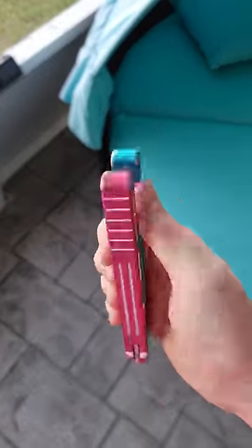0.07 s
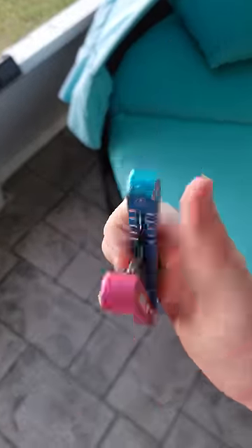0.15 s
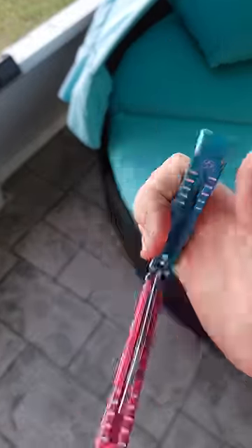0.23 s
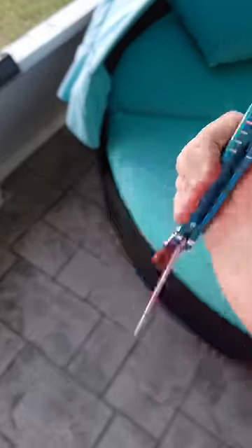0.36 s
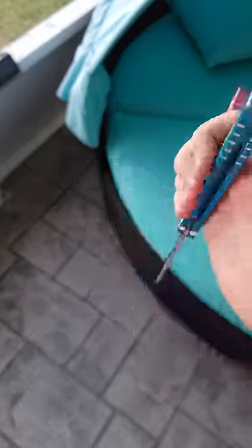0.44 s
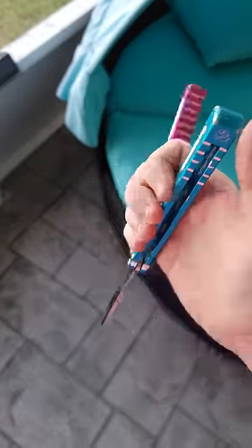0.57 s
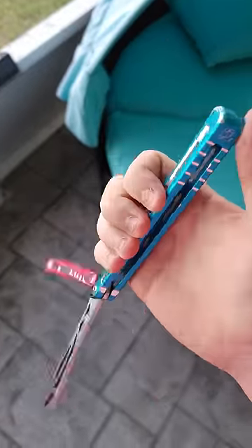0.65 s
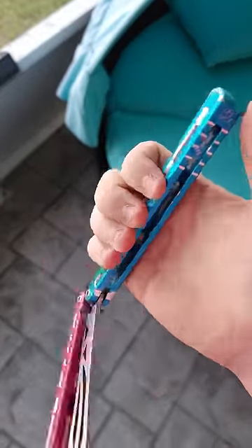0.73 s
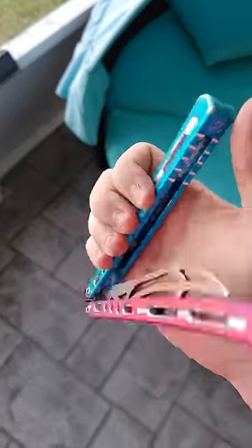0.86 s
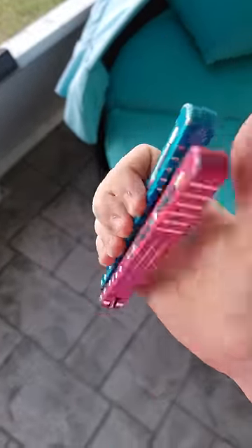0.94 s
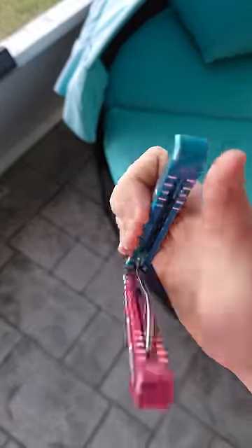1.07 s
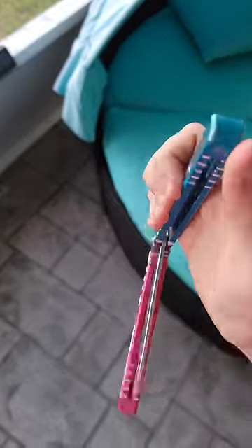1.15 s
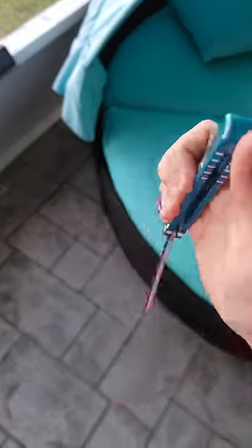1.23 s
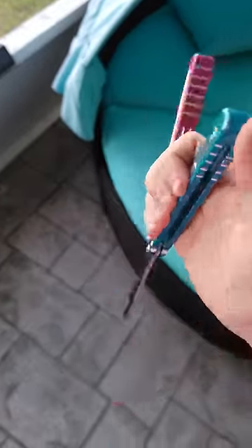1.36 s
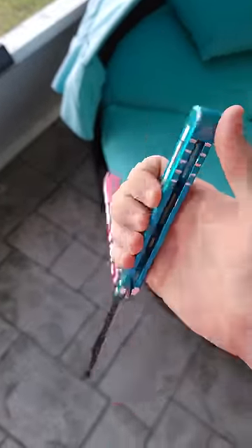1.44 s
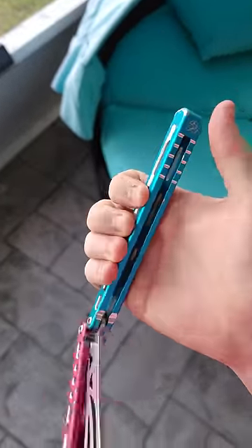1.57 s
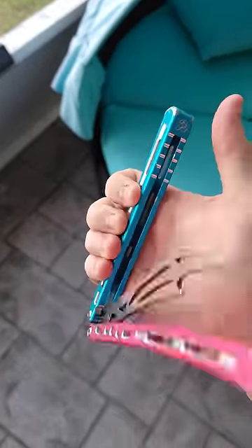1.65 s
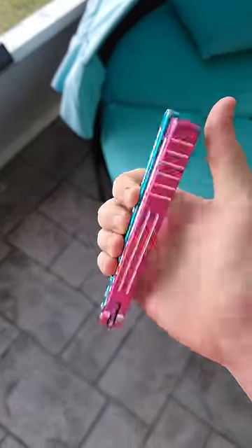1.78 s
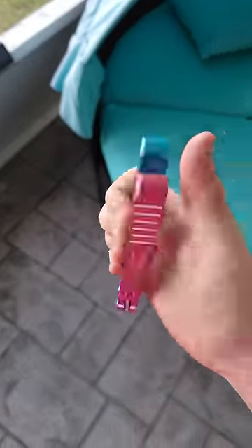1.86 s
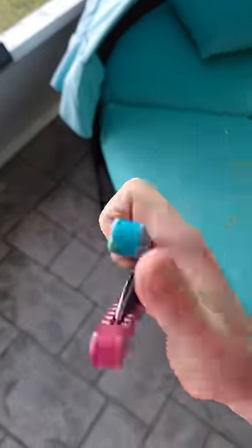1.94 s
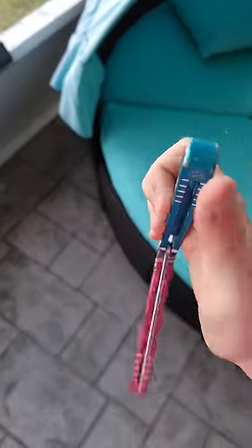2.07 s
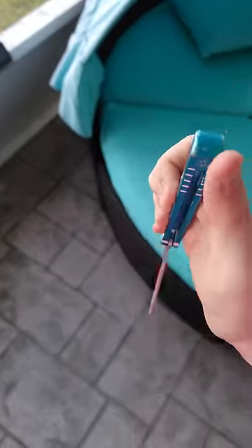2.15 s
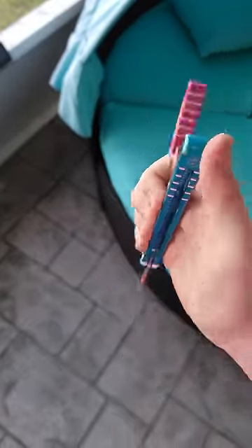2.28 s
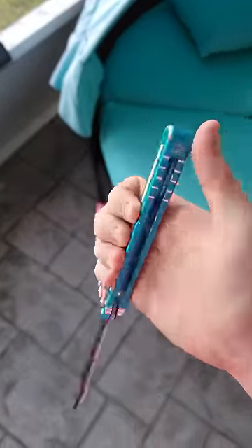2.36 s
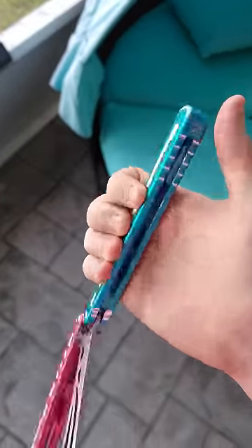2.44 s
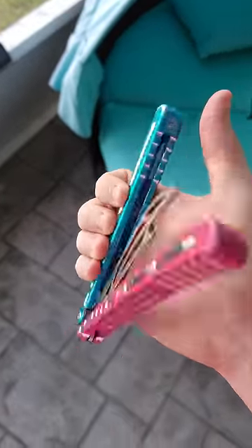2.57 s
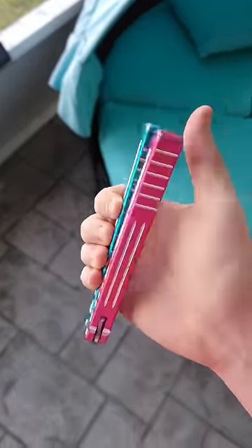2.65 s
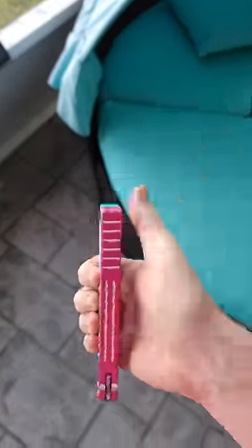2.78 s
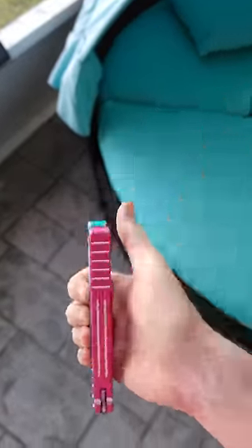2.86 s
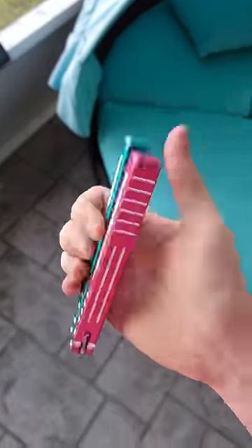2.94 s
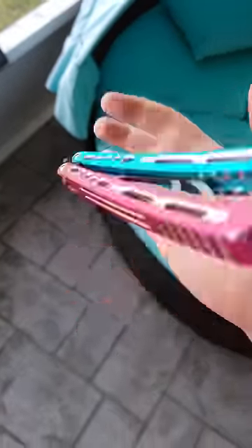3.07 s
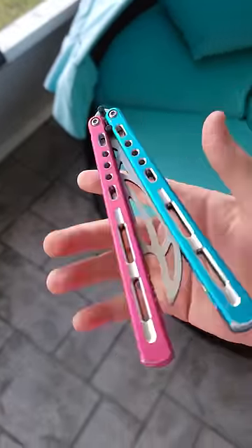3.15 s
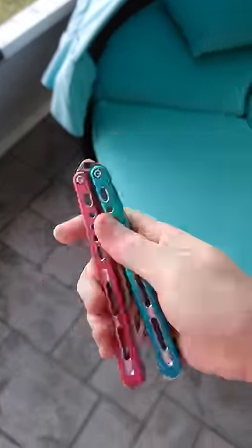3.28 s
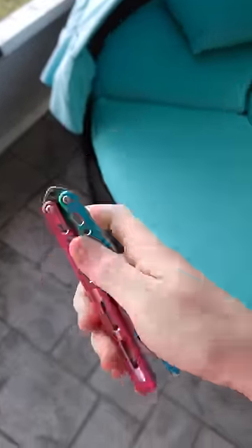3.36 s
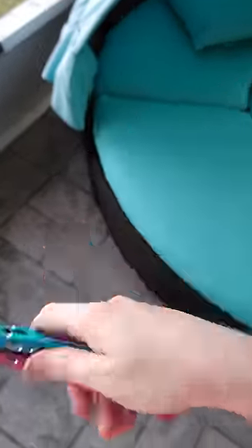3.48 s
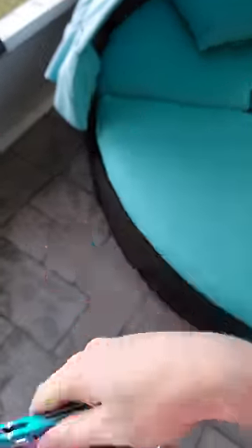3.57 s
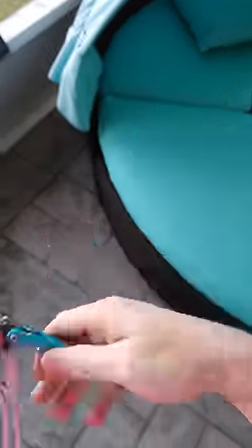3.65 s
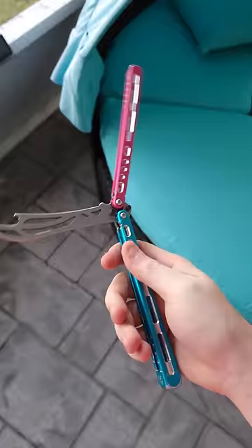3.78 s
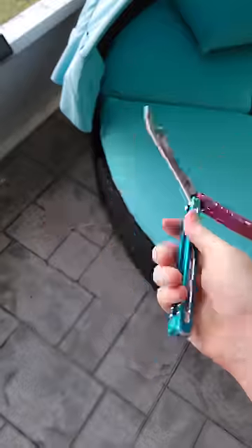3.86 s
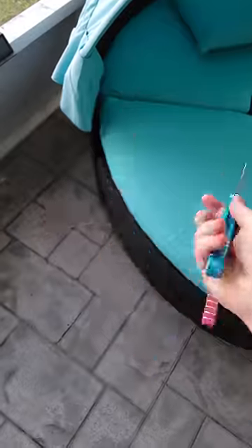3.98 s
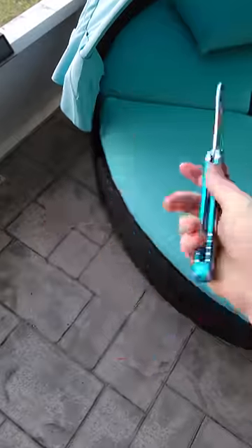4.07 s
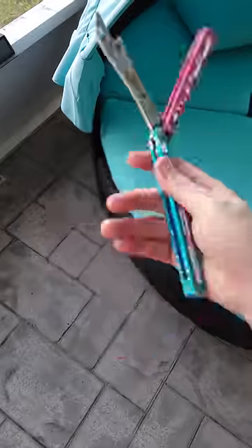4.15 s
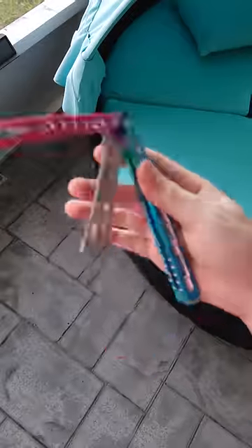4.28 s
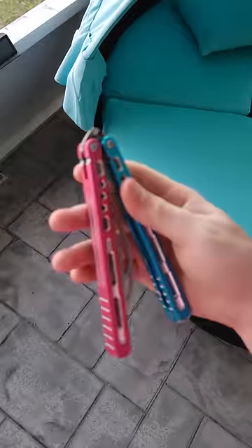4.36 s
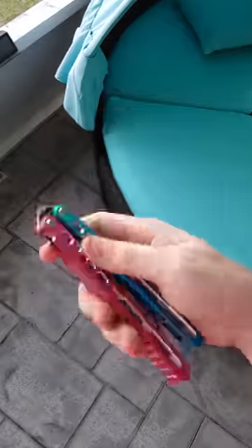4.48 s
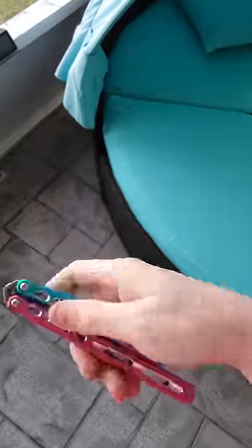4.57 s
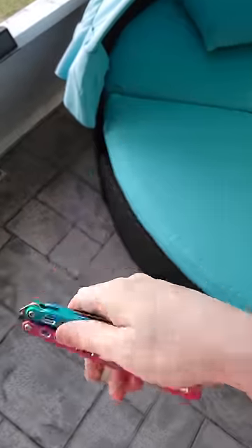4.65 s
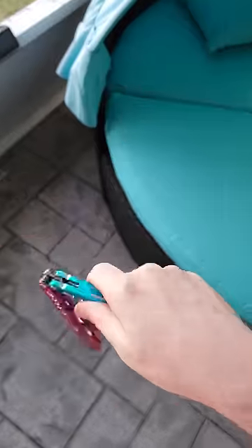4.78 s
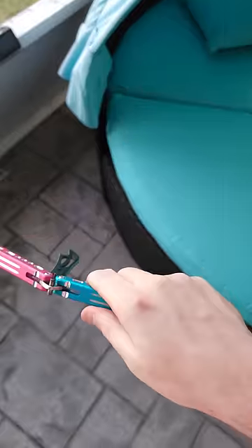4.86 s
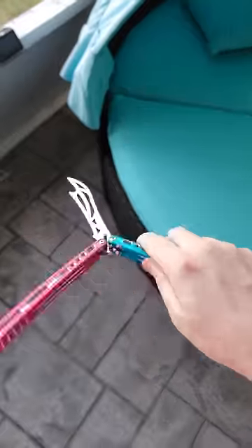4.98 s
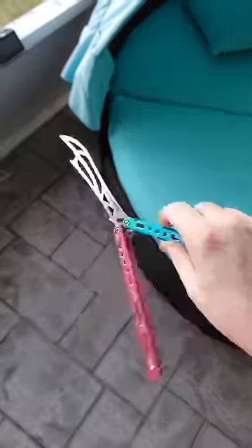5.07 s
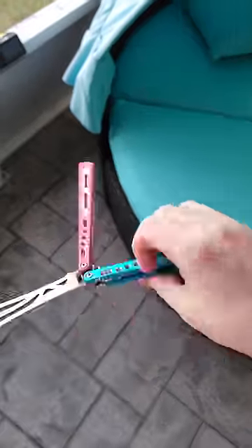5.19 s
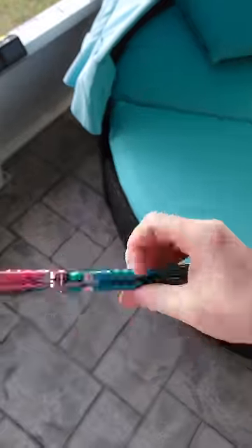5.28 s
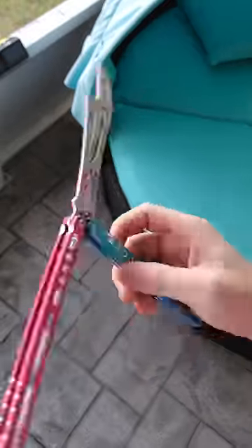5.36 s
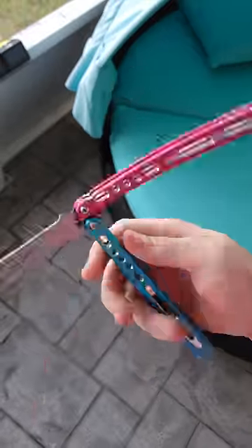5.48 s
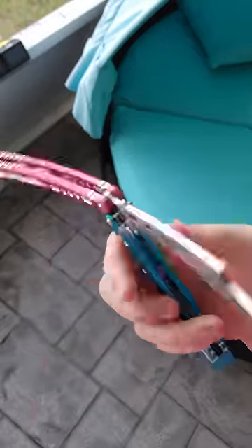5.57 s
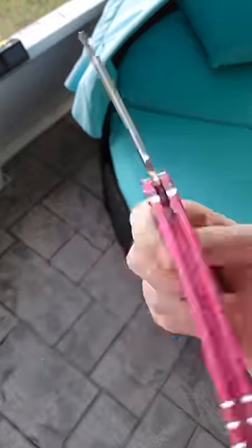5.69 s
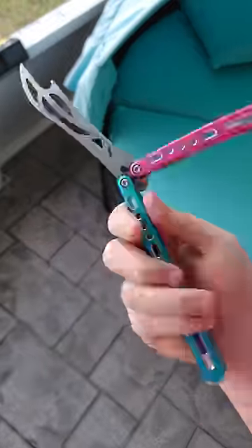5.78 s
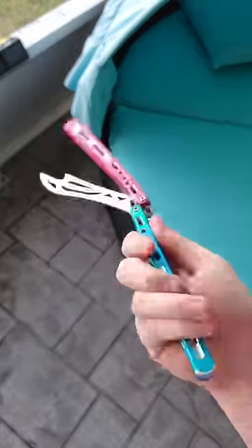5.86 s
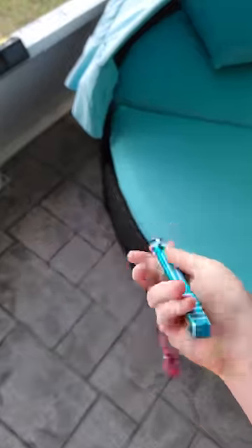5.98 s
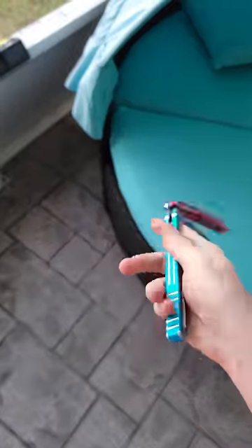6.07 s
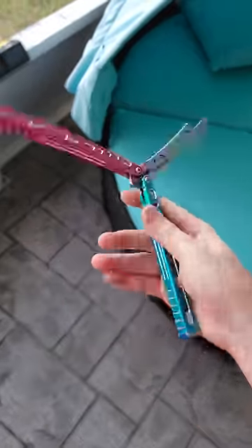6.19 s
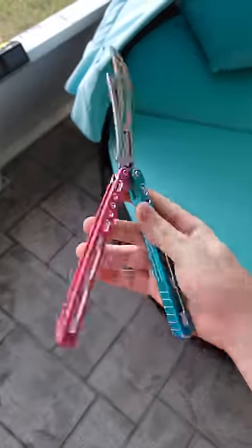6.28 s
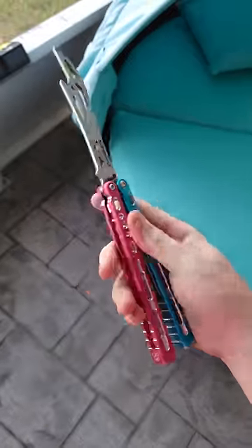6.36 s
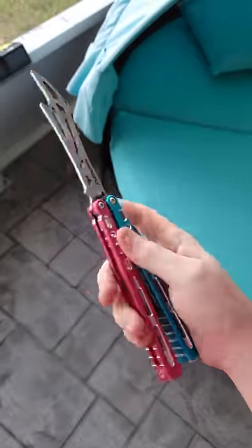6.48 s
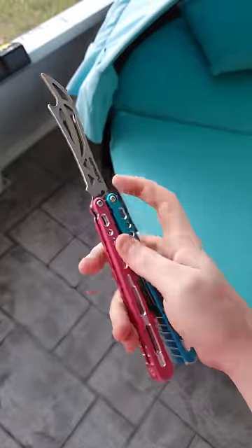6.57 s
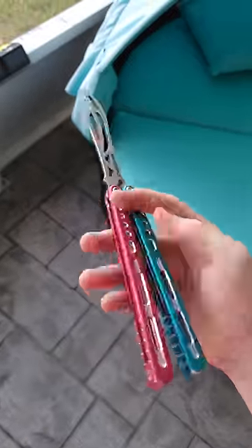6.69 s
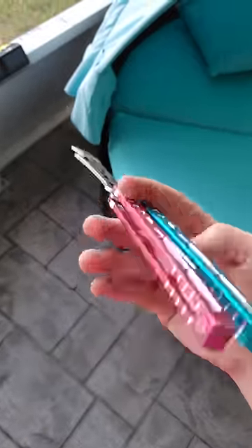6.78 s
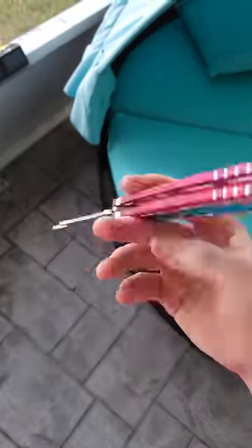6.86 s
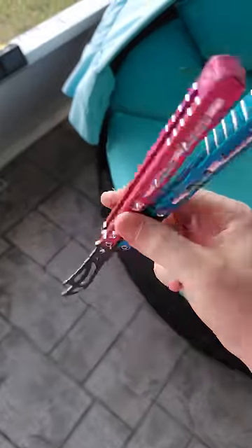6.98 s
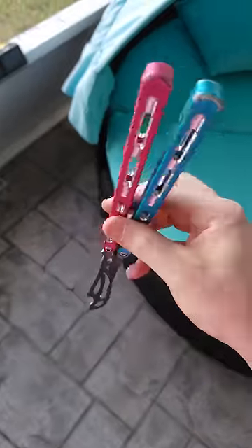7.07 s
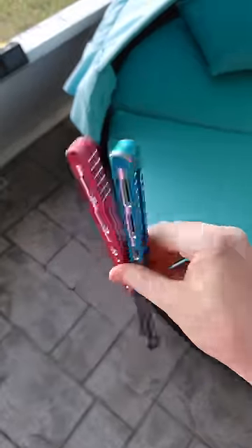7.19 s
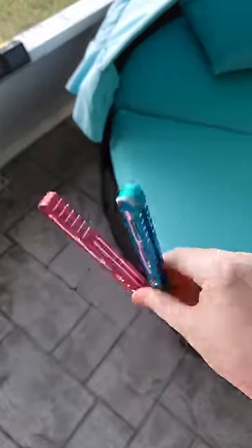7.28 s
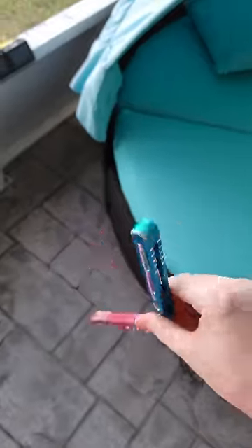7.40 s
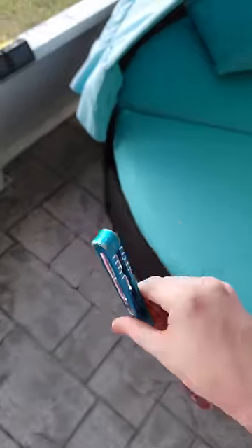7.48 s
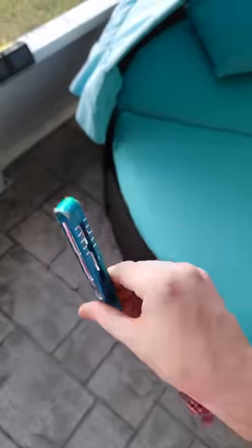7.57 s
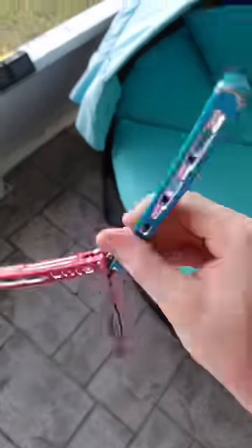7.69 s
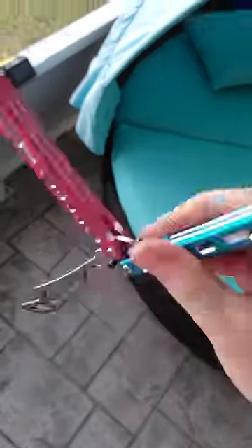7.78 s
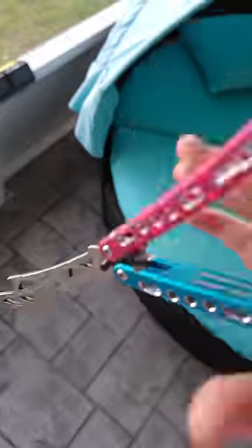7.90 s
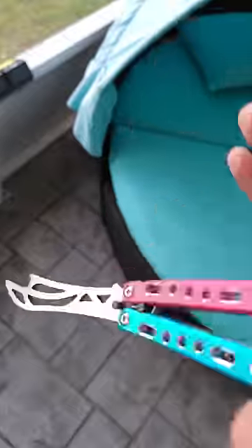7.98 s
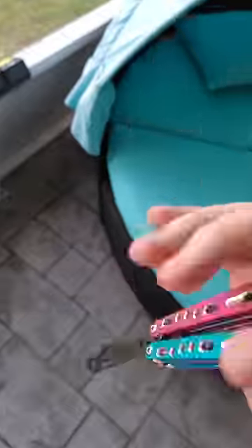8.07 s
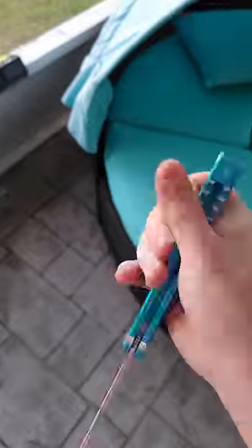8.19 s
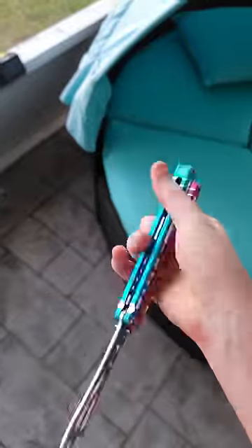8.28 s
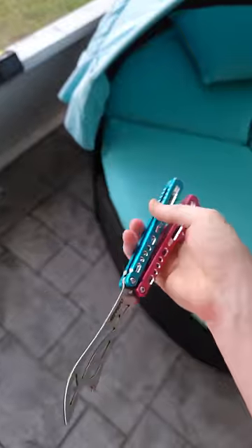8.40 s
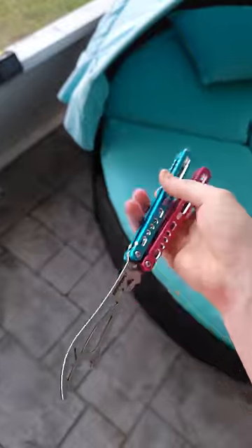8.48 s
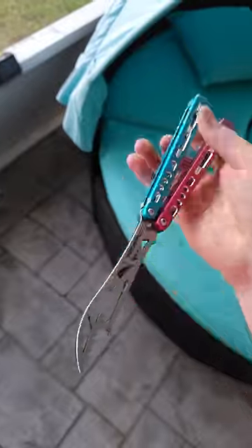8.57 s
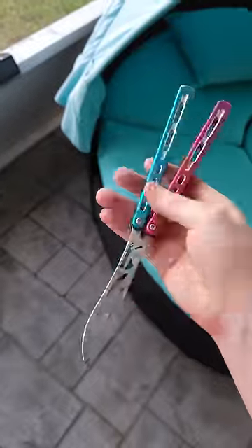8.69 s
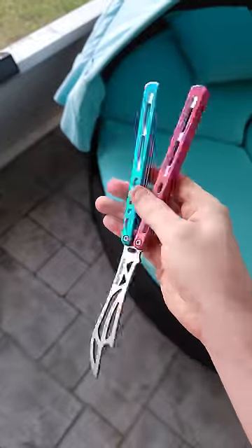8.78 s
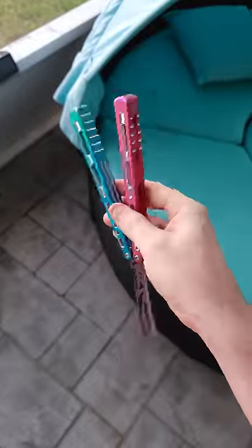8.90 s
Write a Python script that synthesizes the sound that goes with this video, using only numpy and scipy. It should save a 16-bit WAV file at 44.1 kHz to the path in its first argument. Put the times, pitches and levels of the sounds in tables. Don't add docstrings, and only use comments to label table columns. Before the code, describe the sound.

Sharp metallic clicks, hard ringing slams and rapid rattles of a folding knife being flipped, with gaps of quiet outdoor air and low hum.

```python
import sys
import numpy as np
from scipy import signal
from scipy.io import wavfile

SR = 44100
rng = np.random.default_rng(int(sys.argv[2]) if len(sys.argv) > 2 else 0)


def level_to_linear(level):
    exponent = np.asarray(level, float) / 20
    return 10 ** exponent


def materialize(psi):
    bounded = np.clip(np.atleast_2d(psi).T, -1, 1)
    quanta = np.round(bounded * 32767).astype(np.int16)
    wavfile.write(sys.argv[1], SR, quanta)


N = 394254
SPAN, RUN_UP, PORT_GAP = 4800, 800, 17

# centre_hz, width_hz, level_db
CRACK_PEAKS = [(850, 1400, -23.5), (2970, 670, -12), (3540, 820, -7.5), (5820, 380, -2), (6280, 180, 7),
               (6810, 680, 0), (7237, 1100, -7), (9000, 550, -14), (10800, 1600, -15), (13600, 1500, -23.5),
               (15000, 750, -28)]
# pitch_hz, level_db, t60_s
BLADE_MODES = [(3480, -30, .05), (5664, -25.5, 0.03), (6360, -18.5, 0.06), (6510, -22.5, 0.041),
               (7070, -27, 0.063), (9190, -39.5, 0.14), (9700, -41.5, 0.11), (10600, -38, .09),
               (11000, -40.5, 0.08), (11640, -39.5, .09), (12880, -38.5, .1), (13856, -41.5, .08)]
# pitch_ratio, level_db, t60_s, start_rad
HANDLE_MODES = [
    (1.005, 0, 0.025, 1.5),
    (1.045, -8, 0.029, 3.5),
    (.96, -14, 0.036, 4),
    (1.01, -24, 0.13, -0.5),
    (0.88, -32, 0.088, 1.0),
]
# pitch_hz, level_db, t60_s
PALM_MODES = [
    (274.8, -1, 0.032),
    (370, -1, 0.033),
    (600, -6.5, .025),
]
# pitch_hz, level_db, t60_s
CROSS_MODES = [(3080, 2, 0.015), (5850, -3, 0.012), (11750, -7, 0.012)]


def knife():
    spit, ring, thud = np.zeros((3, 2, N + SPAN))
    t = np.arange(SPAN) / SR - RUN_UP / SR
    after = np.maximum(t, 0)
    lead_in_swell = level_to_linear(-35 + 60 * t / 0.05)
    snap = level_to_linear(-60 * after / 0.0074)
    pin_buzz = level_to_linear(-19.0 - 60 * after / 0.074)
    burst = np.where(t < 0, lead_in_swell, snap + pin_buzz)
    for s, crack_db, ring_db, hz, gripped, pan_db, lead_ms in contacts():
        at = round(s * SR) - RUN_UP
        here = slice(at, at + SPAN)

        damping, dull, lift_db = 2.2 ** gripped, 0.9 * gripped, 5.5 * gripped
        noise = rng.standard_normal((2, SPAN)) * burst
        near, other = (noise + dull * np.roll(noise, 1, axis=1)) / (1 + dull)

        contact_s = 0.00061 * level_to_linear(0.55 * (ring_db - crack_db))
        handle = modes(t, np.array(HANDLE_MODES) / [1, 1, damping, 1], hz, contact_s,
                       spread_db=-0.13, spread_rad=0.37)
        blade = modes(t, BLADE_MODES, 1.0, rise_s=0.0003, spread_db=5.0, spread_rad=5.1)
        cross = modes(t, CROSS_MODES, 1.0, rise_s=0.00041, spread_db=2.5, spread_rad=3.4)
        palm = modes(t, PALM_MODES, 1.0, rise_s=0.0006, spread_db=4.5, spread_rad=1.0)

        body = level_to_linear(ring_db + 2.5 + 2200 * contact_s + lift_db) * handle
        body += level_to_linear(crack_db) * blade
        body += level_to_linear(ring_db - 19 + 4.3 * gripped) * cross
        thud[:, here] += level_to_linear(1.9 * ring_db - 30) * palm
        ring[0, here] += level_to_linear(pan_db / 2) * np.roll(body, -round(lead_ms * SR / 1000))
        ring[1, here] += level_to_linear(-pan_db / 2) * body
        right = 0.7 * np.roll(near, PORT_GAP) + 1.1 * other
        spit[0, here] += level_to_linear(crack_db + 2.5 + pan_db / 2) * near
        spit[1, here] += level_to_linear(crack_db - pan_db / 2) * right

    crack = 0
    for k, (hz, width_hz, db) in enumerate(CRACK_PEAKS):
        crack = crack + (-1) ** k * level_to_linear(db + 10) * resonance(spit + 1e-18, hz, width_hz)
    no_lows = signal.butter(6, 1850, "high", fs=SR, output="sos")
    ring = signal.sosfilt(no_lows, ring + 1e-18)
    return (ring + thud + crack)[:, :N]


# start_s, crack_db, ring_db, pitch_hz
SLAM_BLOWS = [(1.0162, -19.5, -2.5, 2498), (1.7817, -8.5, -2.5, 2370), (1.8059, -16.5, -1.5, 2310),
              (1.8113, -10, -5.5, 2390), (1.8183, -15.5, -9, 2370), (2.679, -12, -2, 2330),
              (2.6987, -14, -6, 2300), (2.7036, -16, -1.5, 2346), (2.7106, -15.5, -8, 2330),
              (2.8146, -35, -22, 2300), (4.0152, -18, -25, 2000), (4.042, -24.5, -30, 2020),
              (4.4535, -14, -16, 2310), (6.3865, -14.5, -27.5, 2280), (6.4068, -4, -19.5, 2330),
              (6.8785, -39, -41, 2310), (7.0149, -38, -47, 2300), (7.5625, -23, -26, 2264),
              (7.8369, -29, -17.5, 2088), (8.0375, -11.5, -17.5, 2310), (8.851, -42, -42.5, 2300),
              (8.867, -38, -42, 2330)]
# start_s, crack_db, ring_db, pitch_hz
STOP_BLOWS = [(0.5208, -21, -24, 2370), (0.5663, -23.5, -22.5, 2360), (0.5883, -30.5, -25.5, 2180),
              (0.6594, -33.5, -29, 2404), (0.902, -48.5, -32, 2140), (0.993, -40, -30, 2360),
              (1.376, -19, -10, 2246), (1.4029, -31.5, -22, 2186), (1.5063, -42.5, -28, 2200),
              (1.5217, -47.5, -29.5, 2378), (2.2893, -18, -10, 2217), (2.3219, -30, -23, 2165),
              (2.3991, -28, -19, 2250), (2.4181, -31.5, -22, 2180), (3.9895, -13, -25, 1982),
              (4.3997, -14, -21, 2315), (5.4389, -8.5, -15.5, 2125), (5.5206, -20.5, -23.5, 2143),
              (6.0695, -26, -24, 2142), (8.0024, -14.5, -23, 2095)]
# start_s, crack_db, ring_db
LIGHT_REBOUNDS = [(1.0137, -31, -15), (1.0333, -40, -35), (1.0662, -45.5, -47), (1.1279, -48, -39.5),
                  (1.8225, -19.5, -22.5), (1.835, -28.5, -22), (1.8464, -31, -20.5), (2.3306, -42, -23.5),
                  (2.4344, -38.5, -30.5), (2.7145, -20.5, -19.5), (2.7296, -36.5, -22),
                  (2.7585, -35.5, -29), (3.3072, -38.5, -43.5), (3.3168, -41.5, -44),
                  (3.3358, -35.5, -40.5), (3.3478, -34.5, -42), (3.9934, -26, -31), (4.136, -49, -54),
                  (4.4219, -37.5, -31.5), (5.5515, -34, -39.5), (5.5821, -40.5, -42.5), (5.6003, -43, -49),
                  (5.6137, -42.5, -43), (6.0734, -42.5, -30.5), (6.4249, -27, -32.5), (6.7329, -46, -56.5),
                  (7.0268, -39, -47), (7.8424, -53.5, -32.5), (7.873, -55, -37.5), (8.9119, -47, -56)]
# start_s, mean_gap_s, crack_db, ring_db, loss_db per touch
CHATTER_RUNS = [(1.5308, 0.0072, -48.5, -30, 2.5), (1.8702, .006, -32, -22, 1),
                (1.8791, 0.0064, -29, -18.5, 3), (2.8203, .012, -53.5, -37, 0),
                (4.0307, 0.0045, -28.5, -30.5, 3), (4.048, .0045, -30, -35.5, 1.5),
                (4.4632, 0.0083, -13, -17.5, 2), (4.5075, .006, -22.5, -25, 0),
                (4.524, .0035, -22.5, -25.5, 0.56), (6.412, .004, -19, -28, 3),
                (6.8996, 0.0041, -51.5, -48.5, 3), (7.0347, 0.0068, -52, -51, 4),
                (8.0503, .0065, -12, -16, 0), (8.0781, .011, -15.5, -17, 1),
                (8.1175, .0055, -16, -19.5, -0.5), (8.138, .0034, -16.5, -20, 0),
                (8.175, .004, -16.5, -26, 5)]
CHATTER_TOUCHES = [4, 1, 5, 3, 2, 7, 5, 3, 7, 4, 3, 2, 4, 4, 4, 11, 3]
# time_s, left_right_db, left_lead_ms
HAND_PATH = [(0.5, -8.5, .12), (0.95, 1.5, .11), (1.4, -3, .11), (1.781, 0, .09), (2.7, -1, .075),
             (3.3, -3, .04), (4.0, 2, .04), (4.4, -3.5, .08), (4.55, -2.5, .05), (5.44, -3.5, -.1),
             (5.55, 0, .02), (6.4, 2, .02), (7.56, -5, -.06), (7.99, -0.5, -.03), (8.05, -8, 0.16),
             (8.181, -3.5, .06), (8.9, 0, 0.1)]


def contacts():
    gap_spread, touch_spread_db, pitch_spread, twist_spread_db = 0.15, 2.5, 0.012, 2.5
    free = [(*row, 0) for row in SLAM_BLOWS]
    gripped = [(*row, 1) for row in STOP_BLOWS]
    blows = np.array(sorted(free + gripped))
    light = list(LIGHT_REBOUNDS)
    for (s, gap_s, crack_db, ring_db, loss_db), touches in zip(CHATTER_RUNS, CHATTER_TOUCHES):
        k, luck = np.arange(touches), rng.standard_normal((3, touches))
        times = s + gap_s * (k + gap_spread * luck[0] * (k > 0))
        cracks = crack_db - loss_db * k + touch_spread_db * luck[1]
        rings = ring_db - loss_db * k + touch_spread_db * luck[2]
        light += zip(times, cracks, rings)
    light = np.array(light)

    last = blows[np.searchsorted(blows[:, 0], light[:, 0]) - 1]
    hz = last[:, 3] * (1 + pitch_spread * rng.standard_normal(len(light)))
    rows = np.vstack([blows, np.column_stack([light, hz, last[:, 4]])])
    s, pan_db, lead_ms = np.transpose(HAND_PATH)
    twist_db = twist_spread_db * rng.standard_normal(len(rows))
    pan_db = np.interp(rows[:, 0], s, pan_db) + twist_db
    return np.column_stack([rows, pan_db, np.interp(rows[:, 0], s, lead_ms)])


def modes(t, table, scale, rise_s, spread_db, spread_rad):
    ratio, db, t60, *start = np.transpose(table)[:, :, None]
    luck = rng.standard_normal((2, len(table), 1))
    t = np.maximum(t, 0)
    level = level_to_linear(db + spread_db * luck[0] - 60 * t / t60)
    phase = 2 * np.pi * ratio * scale * t + sum(start) + spread_rad * luck[1]
    return (level * np.sin(phase)).sum(axis=0) * (1 - np.exp(-t / rise_s))


def resonance(x, hz, width_hz):
    r = np.exp(-np.pi * width_hz / SR)
    zeros = np.array([1, 0, -1]) * (1 - r * r) / 2
    return signal.lfilter(zeros, [1, -2 * r * np.cos(2 * np.pi * hz / SR), r * r], x)


# centre_hz, level_db per Hz, t60_s
PORCH_TAIL = [(1500, 1, 0.23), (2300, 1, 0.2), (4000, -0.5, 0.16), (6500, 2.5, 0.19), (10000, 0, .2),
              (16000, -1, .17)]


def porch(x):
    t = np.arange(SR // 2) / SR
    white = rng.standard_normal((2, 2, len(t)))
    centres, _, t60s = np.transpose(PORCH_TAIL)
    tail = 0
    for k, (hz, sos) in enumerate(bands(200)):
        decay = level_to_linear(at_hz(PORCH_TAIL, hz) - 60 * t / np.interp(hz, centres, t60s))
        tail = tail + decay * signal.sosfilt(sos, white[k % 2])
    tail *= 1 - np.exp(-(t / 0.006) ** 2)
    return level_to_linear(-42.0) * signal.fftconvolve(x, tail, axes=1)[:, :N]


def bands(low_hz):
    edges = low_hz * 2 ** np.arange(0, np.log2(19000 / low_hz), 1 / 3)
    return [(np.sqrt(a * b), signal.butter(2, [a, b], "band", fs=SR, output="sos"))
            for a, b in zip(edges, edges[1:])]


def at_hz(points, hz, column=1):
    points = np.array(points)
    return np.interp(np.log(hz), np.log(points[:, 0]), points[:, column])


# centre_hz, level_db per Hz
AIR_SPECTRUM = [(140, -5), (200, -12), (350, -8), (450, -11), (740, -12.5), (1300, -19), (2140, -26),
                (4300, -38), (6300, -33), (7300, -35), (8800, -52), (11000, -51.5), (14800, -50),
                (16800, -60)]
# centre_hz, correlation
AIR_LIKENESS = [(60, 0.9), (130, 1), (290, 0.59), (640, -0.44), (1410, -0.56), (3100, -0.07), (6820, -0.43),
                (15000, -0.0)]
# centre_hz, left_right_db
PORT_TILT = [(60, -3), (180, -3.5), (550, -4), (1650, 0), (4970, 3), (15000, 0)]
# time_s, traffic_db, rumble_db
SWELLS = [(0, 9.5, -47), (1.0, 6.5, -46.5), (2.2, 3, -53), (3, 0.5, -50), (4, 3, -51), (5.6, 2.5, -47.5),
          (6.8, 3, -51), (8.4, 2, -48.5), (8.94, 4, -50)]


def outdoors():
    s, *columns = np.transpose(SWELLS)
    traffic_db, rumble_db = [np.interp(np.arange(N) / SR, s, c) for c in columns]
    opposite = np.array([[1], [-1]])
    out, white = 0, rng.standard_normal((2, 2, N))
    for k, (hz, sos) in enumerate(bands(124)):
        mid, side = signal.sosfilt(sos, white[k % 2])
        alike = np.clip(at_hz(AIR_LIKENESS, hz), -1, 1)
        far = np.exp(-np.log2(hz / 1100) ** 2 / 1.7)
        gain = level_to_linear(at_hz(AIR_SPECTRUM, hz) - 36.0 + far * traffic_db + 1.3 * drift(4))
        pair = np.sqrt(1 + alike) * mid + np.sqrt(1 - alike) * side * opposite
        out = out + gain * pair * level_to_linear(at_hz(PORT_TILT, hz) / 2 * opposite)

    low = rng.standard_normal((2, N))
    main = resonance(resonance(low, 58, 5.4), 65, 25)
    low = main + level_to_linear(-9.5) * resonance(low, 42, 36) + level_to_linear(-14) * resonance(low, 85, 36)
    low = rms_one(signal.sosfilt(signal.butter(2, [28, 100], "band", fs=SR, output="sos"), low))
    return out + level_to_linear(rumble_db) * (low[0] * level_to_linear(-1.5 * opposite) + 0.2 * low[1] * opposite)


def drift(rate):
    r = np.exp(-80 * np.pi * rate / SR)
    slow = signal.lfilter([1], [1, -2 * r, r * r], rng.standard_normal(N // 40 + 2002))[2000:]
    return np.interp(np.arange(N) / 40, np.arange(len(slow)), rms_one(slow))


def rms_one(x):
    return x / np.sqrt(np.mean(x ** 2) + 1e-20)


# pitch_hz, level_db rms
HUM_LINES = [
    (120, -48),
    (240, -72),
    (295, -74.5),
]


def hum():
    t = np.arange(N) / SR + np.array([[0.0003], [0]])
    wander = level_to_linear(0.49 * drift(7.6) + np.array([[-0.4], [0.4]]))
    lines = 0
    for hz, db in HUM_LINES:
        lines = lines + np.sqrt(2) * level_to_linear(db) * np.sin(2 * np.pi * hz * t + 0.08 * drift(4))
    return wander * lines


# start_s, length_s, pitch_hz, arch_hz, level_db
SQUEAK_CALLS = [
    (3.6, .12, 9250, 0, -89),
    (4.78, .18, 3330, 0, -79),
    (5.68, .12, 3270, 0, -82),
    (6.8, .08, 14600, 380, -96),
    (6.93, .27, 14700, 1000, -90),
    (7.965, .035, 9220, 0, -71),
    (8.68, .1, 9210, 0, -85),
]


def squeaks():
    sag_hz_per_s = 400
    out, waver = np.zeros(N), drift(30)
    for s, length, hz, arch_hz, db in SQUEAK_CALLS:
        t, at = np.arange(round(length * SR)) / SR, round(s * SR)
        here = slice(at, at + len(t))
        pitch = hz + arch_hz * np.sqrt(np.sin(np.pi * t / length)) - sag_hz_per_s * t
        fade = np.clip(np.minimum(t, length - t) / 0.013, 0, 1)
        level = np.sqrt(2) * level_to_linear(db + 1.5 * waver[here])
        out[here] += fade * level * np.sin(2 * np.pi * np.cumsum(pitch) / SR)
    return out


def scene():
    dry = knife()
    return dry + porch(dry) + outdoors() + hum() + squeaks()


def low_pass(x):
    return signal.sosfilt(signal.butter(12, 16990, fs=SR, output="sos"), x)


def record(dry):
    headroom = 0.87
    rounded = headroom * np.tanh(1.1 * dry / headroom)
    top = signal.butter(10, 16100, fs=SR, output="sos")
    return low_pass(signal.sosfilt(top, rounded))


dry = scene()
out = record(dry)
materialize(out)
```